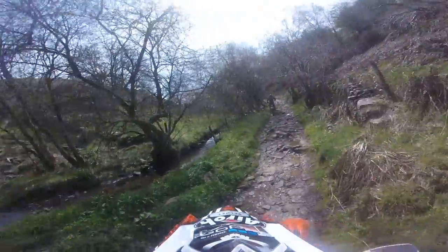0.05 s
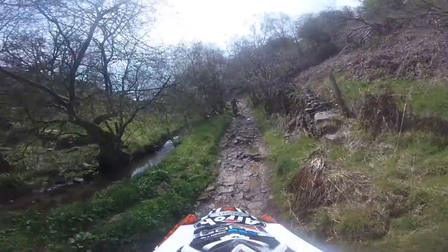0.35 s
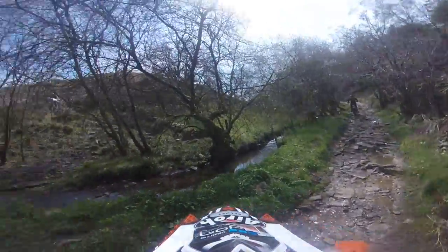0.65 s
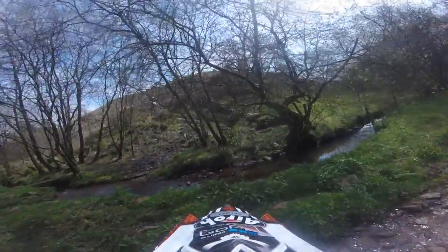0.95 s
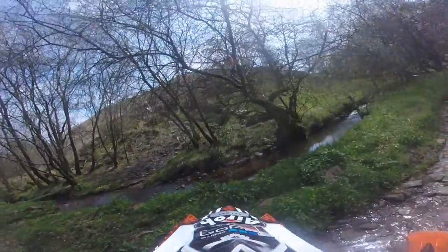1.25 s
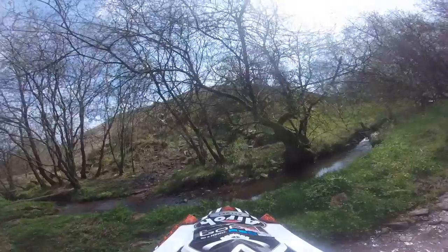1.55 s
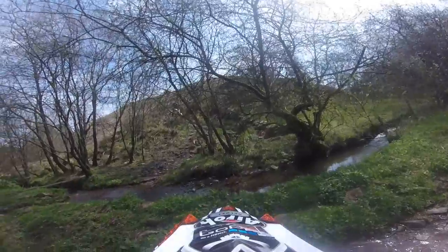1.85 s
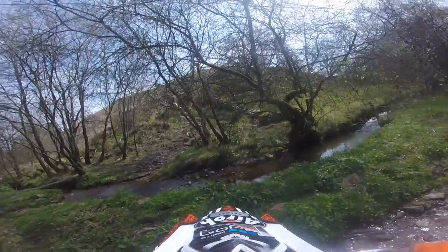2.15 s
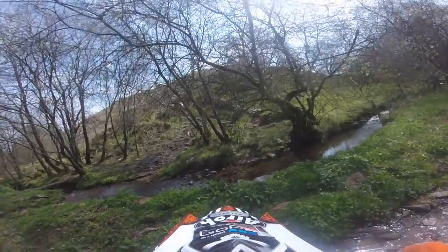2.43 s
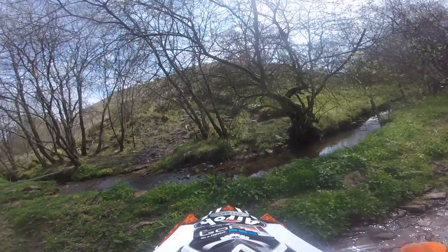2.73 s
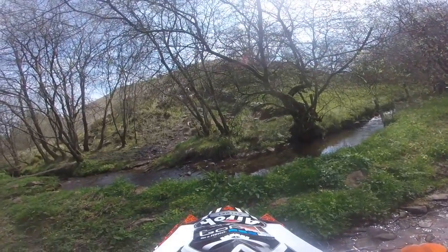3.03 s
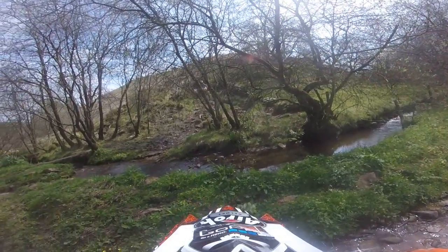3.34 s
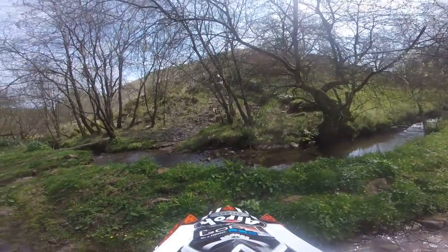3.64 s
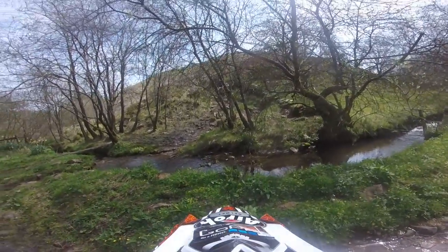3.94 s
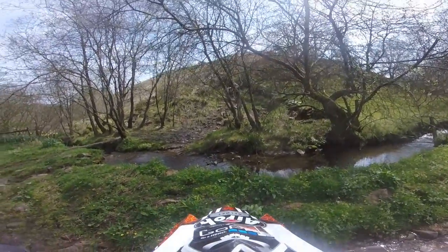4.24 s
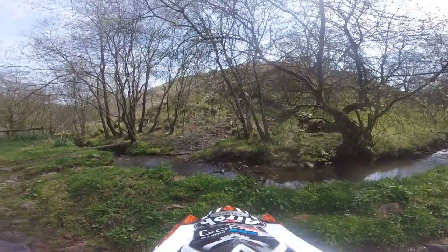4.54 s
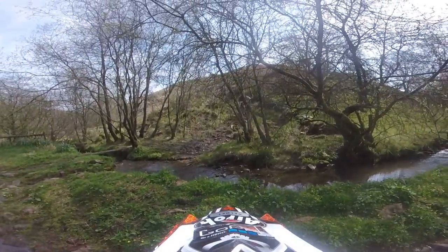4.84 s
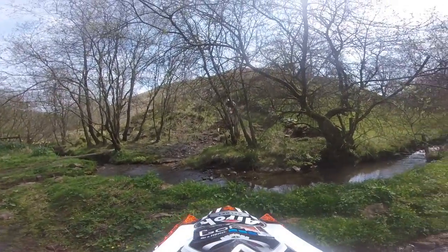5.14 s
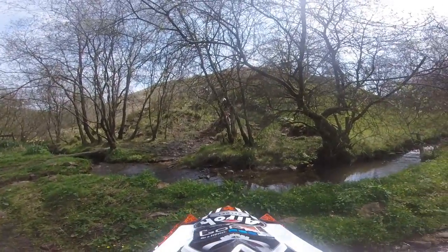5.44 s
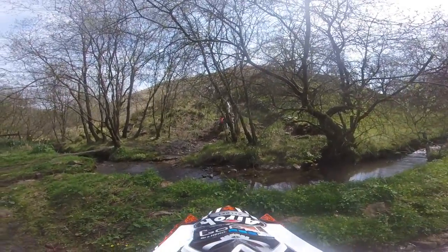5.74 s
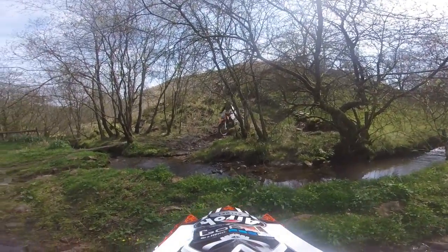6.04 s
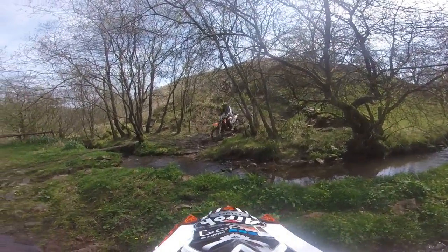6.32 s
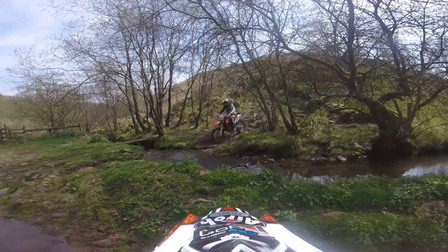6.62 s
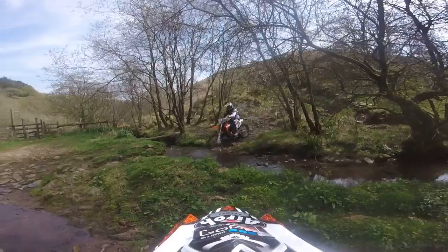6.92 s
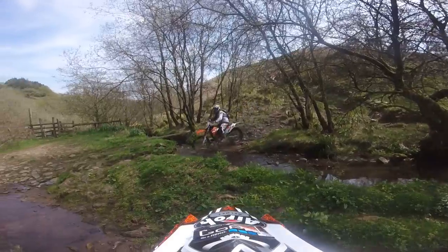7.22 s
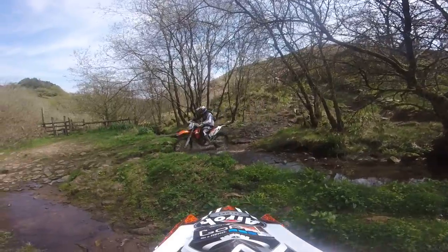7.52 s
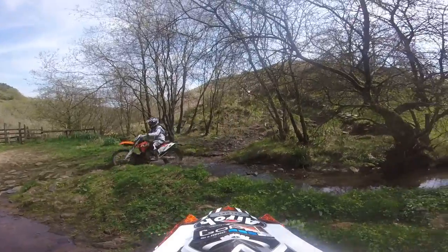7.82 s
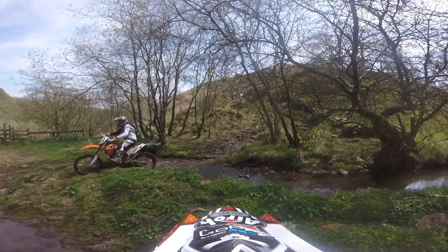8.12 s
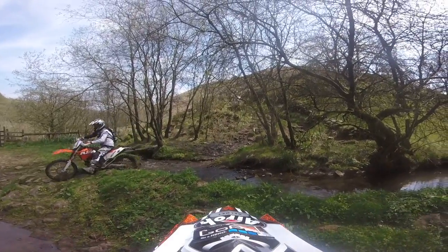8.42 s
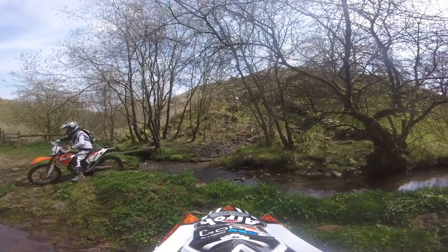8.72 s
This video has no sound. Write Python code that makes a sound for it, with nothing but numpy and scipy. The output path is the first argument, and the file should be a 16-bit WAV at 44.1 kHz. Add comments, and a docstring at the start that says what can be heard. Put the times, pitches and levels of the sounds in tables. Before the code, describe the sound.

A close dirt bike idles unevenly and shuts off, while a second one revs farther away, then splashes through a stream.

```python
"""Two dirt bikes at a stony ford

A two-stroke idles unevenly under a helmet microphone, popping and knocking, and is switched off at 3.4 s.
A second bike barks along the far bank, drops to tickover, fords the stream with spray and clacking
stones, and rolls past. Bubbles hiss throughout, wind rumbles on the microphone and a bird chips once."""
import sys
import numpy as np
from scipy import signal
from scipy.fft import rfft, irfft, next_fast_len
from scipy.io import wavfile
from scipy.ndimage import uniform_filter1d

SR = 44100
rng = np.random.default_rng(int(sys.argv[2]) if len(sys.argv) > 2 else 0)


def log_audio(samples):
    """Write samples as a 16-bit WAV file to the path given in sys.argv[1]."""
    # one column per channel
    frames = np.atleast_2d(samples).T
    # limit to full scale, then quantise
    limited = np.clip(frames, -1, 1)
    pcm = np.round(limited * 32767).astype(np.int16)
    wavfile.write(sys.argv[1], SR, pcm)


N = 391166
T = np.arange(N) / SR
IDLE_HZ = 18   # nominal firing rate of the near bike; engine speeds are all in firings per second


def from_db(db):
    """Decibels to gain."""
    return 10 ** (np.asarray(db) / 20)

def rms_one(x):
    """Scales to an rms of 1."""
    return x / np.sqrt(np.mean(x ** 2) + 1e-20)

def in_time(rows):
    """Straight lines through (t/s, value) points."""
    return np.interp(T, *np.transpose(rows))

def ramp(start_s, length_s):
    """Rises from 0 to 1 and stays there."""
    return np.clip((T - start_s) / length_s, 0, 1)

def swells(rows):
    """Bell-shaped gain swells (t/s, half length/s, level/dB), added in power."""
    return np.sqrt(sum((from_db(db) * np.exp(-((T - s) / half) ** 2)) ** 2 for s, half, db in rows))

def drift(per_s):
    """A random wander, rms 1."""
    knots = rng.standard_normal(int(N / SR * per_s) + 2)
    return rms_one(np.interp(T * per_s, np.arange(len(knots)), knots))

def evened(x):
    """Holds noise at a steady level of 1, so that gusts can shape it."""
    return x / np.sqrt(uniform_filter1d(x ** 2, size=12000))

def filtered(x, order, hz, kind):
    """Butterworth filter."""
    return signal.sosfilt(signal.butter(order, hz, kind, fs=SR, output="sos"), x)

def body(x, colour, modes=()):
    """Plays x through a broad colour with resonances on top; minimum phase, unit power gain."""
    size = next_fast_len(N + SR // 2, True) // 2 * 2
    hz = np.arange(size // 2 + 1) * SR / size + 1e-3
    at, level = np.transpose(colour)
    db = np.interp(np.log(hz), np.log(at), level) - 40 * np.log10(np.maximum(hz / at[-1], 1))
    for centre, width, lift in modes:
        db = db + lift / (1 + (2 * (hz - centre) / width) ** 2)
    cepstrum = irfft(np.log(rms_one(from_db(db))))
    response = np.exp(rfft(2 * cepstrum[:size // 2], size) - cepstrum[0])
    return irfft(rfft(x, size) * response)[:N]

def ring(x, hz, width_hz):
    """One damped mode, rms 1."""
    r = np.exp(-np.pi * width_hz / SR)
    return rms_one(signal.lfilter([1, 1], [1, -2 * r * np.cos(2 * np.pi * hz / SR), r * r], x + 1e-18))

def grains(per_s, spread_db):
    """Tiny impacts at random moments, their sizes scattered by spread_db."""
    sizes = from_db(spread_db * np.minimum(rng.exponential(1, N), 4)) * rng.choice([-1, 1], N)
    return rms_one(sizes * (rng.random(N) < per_s / SR))

def crank(speed, firing_s):
    """Crank turns counted from one firing; the others fall on the whole numbers."""
    turns = np.cumsum(speed) / SR
    return turns - np.interp(firing_s, T, turns)

def per_cycle(turns, spread_db):
    """A fresh strength for every turn."""
    cycle = np.floor(turns - np.floor(turns[0])).astype(int)
    return from_db(spread_db * rng.standard_normal(N // 1000))[cycle]

def stroke(turns, angle, width):
    """A smooth swell around one crank angle; angle and width in turns."""
    return np.exp(-(((turns - angle + .5) % 1 - .5) / width) ** 2)

def pops(turns, spread_db, rough, tail):
    """A pressure kick at each firing, trailed by a turbulent rush that decays over `tail` turns."""
    blows = rms_one(np.diff(np.floor(turns), prepend=np.floor(turns[0])))
    rush = rms_one(rng.standard_normal(N) * np.exp(-(turns % 1) / tail))
    return rms_one((blows + rough * rush) * per_cycle(turns, spread_db))

def slap(turns, tail, rise=.034):
    """A burst of metal chatter once a turn; tail and rise in turns."""
    share = turns % 1
    burst = np.minimum(share / rise, 1) * np.exp(-share / tail)
    return rms_one(burst * per_cycle(turns, spread_db=.8) * rng.standard_normal(N))


def stream():
    """Running water: a dense, steady fizz of bubbles."""
    # colour of the fizz: f/Hz, level/dB
    colour = [(100, 4), (190, 3), (300, 5), (500, -4), (900, -7), (1260, -3.5), (1450, -8), (2220, -11.5),
              (2800, -10.5), (3900, -16.5), (6000, -20), (9000, -26), (12000, -34.5), (14000, -38)]
    return from_db(-57.5) * body(grains(per_s=9000, spread_db=2), colour)

def wind():
    """An easing breeze and its gusts drive eddies on the microphone; buffets thud and leave a swing."""
    # gusts: t/s, half length/s, level/dB
    gusts = [(.05, 0.21, -34.5), (0.64, 0.4, -35), (1.29, 0.12, -29), (3.64, 0.25, -40),
             (0.936, 0.05, -28.5)]
    # colour of the eddies: f/Hz, level/dB
    rumble = [(8, -17), (16, -11), (24, 4), (34, 2), (48, -13), (80, -12.5), (150, -37.5), (400, -70)]
    # single buffets: t/s, peak/dB, half length/s, microphone swing/Hz
    buffets = [(0.031, -10.5, 0.017, 6.2), (0.769, -10.5, 0.025, 5.6), (1.231, -7.5, 0.0097, 15.5),
               (3.7, -17, 0.025, 16.6), (3.923, -21.5, 0.024, 12), (6.408, -38, .011, 27),
               (7.677, -29.5, 0.016, 13.5), (7.901, -43, .011, 31)]
    breeze_db, calm_db = -44, -53.5
    force = np.hypot(from_db(breeze_db + (calm_db - breeze_db) * ramp(4.35, .59)), swells(gusts))
    subsonic = filtered(rng.standard_normal(N + SR), 4, [4, 13], "band")[SR:]
    out = force * (evened(body(rng.standard_normal(N), rumble)) + from_db(6.5) * evened(subsonic))
    turbulence = evened(filtered(rng.standard_normal(N), 5, [45, 98], "band"))
    for s, db, half, hz in buffets:
        puff = -np.exp(-((T - s) / half) ** 2)
        swing = filtered(puff, 4, hz, "high")
        thud = swells([(s, .039, db - 26)]) * (.011 / half) ** 2 * turbulence   # slow puffs thud less
        out = out + from_db(db) * swing / np.abs(swing).max() + thud
    return out * ramp(0, .02)

def bird():
    """One thin rising note."""
    # the chip: t/s, length/s, start f/Hz, end f/Hz, level/dB
    chips = [(1.725, 0.05, 5840, 5970, -59.5)]
    s, length, start_hz, end_hz, db = chips[0]
    along = ramp(s, length)
    pitch = start_hz + (end_hz - start_hz) * along
    return from_db(db) * np.sin(np.pi * along) ** 2 * np.sin(2 * np.pi * np.cumsum(pitch) / SR)

def tyre_spray():
    """Front and rear wheel throw showers of droplets in the ford."""
    # wheel washes: t/s, half length/s, level/dB
    washes = [(7.24, 1, -62.5), (7.62, 0.089, -55), (7.62, .3, -60), (8.1, 0.061, -64)]
    # colour of the spray: f/Hz, level/dB
    splash = [(500, -8), (1600, 4), (2300, -7), (3000, 7.5), (3650, 5), (4500, -14), (5200, -7),
              (6500, -15), (7800, -13), (10000, -41), (13000, -41)]
    return body(swells(washes) * from_db(2 * drift(25)) * grains(per_s=4000, spread_db=1.5), splash)

def stones():
    """The wheels knock stones together: each gives a gritty clack and a short ring."""
    # stone hits: t/s, clack level/dB, decay/s, ring f/Hz, ring level/dB
    hits = [(3.85, -74, .025, 1800, -59), (6.125, -55, .015, 7400, -79), (6.575, -52, 0.009, 5360, -64),
            (6.829, -51.5, 0.014, 5270, -62), (6.995, -48, 0.014, 3060, -55),
            (7.012, -56, 0.013, 2920, -57), (7.071, -62, 0.01, 7900, -69)]
    # colour of stone on stone: f/Hz, level/dB
    clack = [(500, -4), (1500, 9), (2300, -1), (3200, 14.5), (4500, -2), (6000, -8.5), (7900, -2.5),
             (9500, -31), (13000, -22)]
    grit, knocks, rings = rng.standard_normal(N), 0, 0
    for s, db, decay, hz, ring_db in hits:
        dying = ramp(s, .001) * np.exp(-np.abs(T - s) / decay)
        knocks = knocks + from_db(db) * dying
        rings = rings + from_db(ring_db) * dying * ring(grit, hz, width_hz=280)
    return body(knocks * grit, clack) + rings


def through_trees(x):
    """Echoes off bank and trunks come and go as the bike moves, so overtones swell and fade singly."""
    echoes = sum(drift(7) * np.interp(T - delay_s, T, x) for delay_s in (.007, .019, .046, .083))
    return rms_one(x + from_db(-5) * echoes)

def rider_low_end(turns, speed, thump_db):
    """The second bike's firings thump in the exhaust, drone in the pipe and boom in the airbox."""
    # colour of the exhaust thump: f/Hz, level/dB
    thump_pipe = [(35, -12), (65, -5.5), (88, -5.5), (112, -3.5), (137, -2.5), (165, -19), (230, -22.5),
                  (400, -35)]
    # drone while the bike faces the listener: t/s, half length/s, level/dB
    drones = [(4.5, 0.11, -66.5), (5.7, 0.34, -62.5), (6.85, 0.67, -59)]
    # colour of the drone: f/Hz, level/dB
    drone_pipe = [(90, -32), (118, -8), (131, -0.5), (142, -6.5), (165, -36), (300, -56)]
    # short airbox booms: t/s, half length/s, level/dB
    booms = [(2.285, 0.051, -38.5), (4.09, 0.014, -45.5), (5.16, 0.095, -42), (5.38, 0.097, -49),
             (6.65, 0.043, -49.5), (6.9, 0.031, -50), (7.43, 0.056, -50.5), (7.9, 0.03, -58),
             (8.08, 0.076, -48)]
    # colour of the airbox: f/Hz, level/dB
    airbox = [(45, -35), (72, 1.5), (88, 12.5), (106, -6.5), (140, -10), (300, -51)]
    # faster firings are each weaker, so the thump keeps its power
    firings = rms_one(pops(turns, spread_db=1.1, rough=.44, tail=.9) / np.sqrt(speed))
    thump = from_db(thump_db) * body(firings, thump_pipe)
    return thump + swells(drones) * body(firings, drone_pipe) + swells(booms) * body(firings, airbox)

def rider_pipe(turns, throttle):
    """Firings ring the second bike's pipe: a clean bark on the throttle over a softer burble."""
    # colour of the pipe: f/Hz, level/dB
    pipe = [(120, -23), (220, -4), (290, 6.5), (330, 3), (395, -6.5), (460, -17), (535, -8), (620, -13.5),
            (1200, -33)]
    # bark at full throttle: t/s, level/dB
    bark_level = [(0, -58), (.45, -54), (.62, -49), (1.15, -51), (1.42, -56), (1.65, -52.5), (2.15, -51),
                  (2.7, -52), (3.25, -59), (3.62, -56.5), (4.3, -63.5)]
    # louder burble coasting down the bank: t/s, half length/s, level/dB
    burbles = [(5.25, .45, -68)]
    distant_pops = through_trees(pops(turns, spread_db=1.2, rough=.4, tail=.9))
    bark = from_db(in_time(bark_level)) * throttle * body(distant_pops, pipe)
    coasting = from_db(-68.5) + swells(burbles)
    passing = from_db(-61) * ramp(8.1, .15)   # the pipe swings towards the listener
    burble = body(pops(turns, spread_db=.7, rough=.55, tail=.9), pipe)
    return bark + np.hypot(coasting, passing) * burble

def rider_metal(turns, near_db):
    """The second bike's chain and valves clatter in time with the crank; taps ring its engine cover."""
    # colour of the engine case: f/Hz, level/dB
    case = [(200, 0.5), (500, 0.5), (700, 1), (930, 6), (1200, -2.5), (1400, -3.5), (1700, 4.5),
            (2300, -17.5), (2750, 5), (3350, 3), (4200, -19.5), (6300, -18), (9000, -38), (14000, -30)]
    # case resonances: f/Hz, width/Hz, lift/dB
    case_modes = [(1245, 130, 12.8), (2704, 140, 5)]
    # the cover rings out down the bank and in the ford: t/s, half length/s, level/dB
    flares = [(5.11, 0.13, -61.5), (5.46, 0.086, -65), (6.1, 0.17, -61), (7.1, 0.36, -62),
              (7.68, 0.05, -55)]
    # cover resonances: f/Hz, width/Hz, level/dB
    cover_modes = [(1270, 22, 0), (1655, 45, -9.5), (1780, 45, -19)]
    throb = 1 + .7 * np.exp(-(turns % 1) / .3) * per_cycle(turns, spread_db=1.8)
    impacts = rms_one(throb * from_db(1.3 * drift(20)) * grains(per_s=6000, spread_db=0))
    clatter = from_db(near_db + 7.5) * body(impacts, case, case_modes)
    taps = pops(turns - .2, spread_db=1.5, rough=.7, tail=.6)
    cover = sum(from_db(db) * ring(taps, hz, width) for hz, width, db in cover_modes)
    cover_gain = np.hypot(from_db(near_db - 3.5), swells(flares))
    chain = ring(throb * grains(per_s=1200, spread_db=4), hz=2820, width_hz=260)
    side_on = ramp(6.66, .84)   # the chain sings as the bike turns
    return clatter + cover_gain * cover + from_db(-65) * side_on * chain

def rider_rasp(turns):
    """Each firing trails a bright, gassy rasp as the second bike comes down to the water."""
    # rasping stretches: t/s, half length/s, level/dB
    rasps = [(6.0, 0.4, -69), (7.1, 0.82, -62.5)]
    # colour of the rasp: f/Hz, level/dB
    colour = [(1500, -16), (2300, -17), (2800, -0.5), (3600, 2), (4400, -18), (8000, -26)]
    return swells(rasps) * body(pops(turns, spread_db=2, rough=4, tail=1), colour)

def second_bike():
    """The rider's engine pulls along the far bank, falls to tickover and comes closer."""
    # speed with the throttle shut: t/s, firing rate/Hz
    tickover_speed = [(3.6, 16.01), (4.2, 15.64), (4.6, 15.28), (4.95, 13.22), (5.2, 15.59), (5.55, 14.75),
                      (5.9, 15.55), (6.4, 16.05), (6.8, 16.88), (7.3, 17.3), (7.9, 17.3), (8.3, 15.05),
                      (8.87, 14.11)]
    # revs on the throttle, wavering over rough ground: t/s, firing rate/Hz
    revs = [(0, 46), (.15, 47.5), (.27, 43), (.35, 46.4), (.51, 45), (.58, 49.9), (.7, 48.9), (.84, 45.7),
            (.91, 41.5), (.96, 44.3), (1.02, 40.4), (1.12, 40), (1.2, 41.5), (1.33, 39.3), (1.54, 55.3),
            (1.65, 53.2), (1.79, 47.5), (1.88, 50), (2.13, 42.3), (2.19, 46.6), (2.26, 45.4), (2.34, 47.8),
            (2.49, 47.4), (2.59, 44), (2.66, 49.2), (2.78, 47.6), (2.84, 50.4), (3, 49.3), (3.09, 53.3),
            (3.32, 49), (3.55, 53), (3.62, 50.8), (3.7, 53.6), (3.95, 46.4), (4.07, 44), (4.32, 42.4),
            (4.52, 13)]
    # base level of the metal as the bike comes into the open and turns away: t/s, level/dB
    approach = [(3.8, -69.5), (4.87, -74), (5.11, -72.5), (5.17, -73), (5.78, -72), (5.85, -67.5),
                (7.46, -64.5), (8.74, -68), (8.87, -63)]
    tickover, near_db = in_time(tickover_speed), in_time(approach)
    speed = np.maximum(tickover, in_time(revs))
    throttle = np.clip((speed - tickover) / 17, 0, 1)   # fully open 17 Hz above tickover
    turns = crank(speed, firing_s=4.611)
    load_db = .5 * throttle - .5 * (tickover - tickover.mean())   # a slower tickover thumps harder
    thump_db = -52.5 + load_db + .35 * (near_db - near_db.mean())
    return (rider_low_end(turns, speed, thump_db) + rider_pipe(turns, throttle)
            + rider_metal(turns, near_db) + rider_rasp(turns))


def idle_exhaust(turns):
    """Exhaust pops ring the near bike's silencer."""
    # colour of the silencer: f/Hz, level/dB
    silencer = [(40, -21), (80, 4.5), (135, -1), (190, -32), (240, -3.5), (330, -8.5), (450, -25),
                (900, -50)]
    # its resonance: f/Hz, width/Hz, lift/dB
    modes = [(72, 20, 9)]
    return from_db(-50) * body(pops(turns, spread_db=.8, rough=.22, tail=.3), silencer, modes)

def idle_intake(turns, speed, angle=.041):
    """The airbox hums with each gulp of air; its pitch loosely follows the speed, and it fades in a sag."""
    from_gulp_s = ((turns - angle + .5) % 1 - .5) / speed
    hz = 234 * (speed / IDLE_HZ) ** .45
    hum = rms_one(np.sin(2 * np.pi * hz * from_gulp_s) * stroke(turns, angle, width=.23))
    return from_db(-46.5 + .9 * np.minimum(speed - IDLE_HZ, 0)) * hum

def idle_gears(turns):
    """Meshing teeth whirr, loaded once a turn."""
    # gears: tooth passes per turn, load angle/turns, width/turns, level/dB
    gears = [(17, 0.18, 0.21, -59), (30, 0.44, 0.3, -64), (35, 0.4, 0.14, -68)]
    whirr = 0
    for teeth, angle, width, db in gears:
        mesh = np.sin(2 * np.pi * teeth * turns + .17 * drift(40))
        load = stroke(turns, angle, width) * from_db(.14 * drift(14))
        whirr = whirr + from_db(db) * rms_one(mesh * load)
    return whirr

def idle_clatter(turns):
    """The engine case rattles all the time; metal knocks and piston slaps land at set crank angles."""
    # metal knocks: angle after the pop/turns, f/Hz, width/Hz, level/dB
    knock_modes = [(.61, 1118, 69, -7), (.57, 830, 86, -21), (0.011, 1290, 25, -13), (0.85, 1100, 58, -26),
                   (.42, 504, 88, -17.5), (0.05, 555, 45, -18), (0.62, 1565, 51, -19),
                   (.91, 765, 87, -18.5), (0.86, 2720, 290, -14.5), (0.69, 3800, 170, -28)]
    # piston slaps: angle/turns, decay/turns, level/dB
    piston_slaps = [(0.59, 0.39, -50), (0.73, 0.17, -52.5), (0.142, 0.16, -57)]
    # colour of the case: f/Hz, level/dB
    case = [(150, 5.5), (330, -8), (420, -7), (650, -5), (880, -6.5), (1200, -10), (1850, -16.5),
            (2250, -16), (2800, -10), (3600, -20), (5100, -27), (5700, -37.5), (6400, -25.5), (7000, -31),
            (10000, -52.5), (14000, -67)]
    # case resonances under the rattle: f/Hz, width/Hz, lift/dB
    case_modes = [(521, 58, 8), (1090, 110, 5.1), (1262, 86, 9), (1550, 140, 9.5), (2630, 120, 1.5),
                  (4540, 180, -1), (5840, 270, -7), (6660, 260, -8)]
    # high resonances that only the slaps reach: f/Hz, width/Hz, lift/dB
    slap_modes = [(2630, 230, 4.6), (5180, 170, 11), (6000, 350, 5.2)]
    # stretches of harder knocks and slaps: t/s, half length/s, added share/dB
    hard_running = [(.08, 0.63, -8.5), (.85, .16, -14), (1.3, 0.18, -7.5)]
    knocks = sum(from_db(db) * ring(pops(turns - angle, spread_db=1.1, rough=.85, tail=.18), hz, width)
                 for angle, hz, width, db in knock_modes)
    rattle = body(grains(per_s=14000, spread_db=2), case, case_modes)
    slaps = sum(from_db(db) * slap(turns - angle, tail) for angle, tail, db in piston_slaps)
    bright = filtered(body(slaps, case, slap_modes), 2, [2000, 6500], "band")
    return from_db(-45.5) * rattle + (1 + swells(hard_running)) * (from_db(-49) * knocks + bright)

def idle_tick(turns):
    """A crisp metal tick once a turn, as hard at any speed."""
    # ring of the tick: f/Hz, width/Hz, level/dB
    modes = [(3760, 600, -78), (4960, 120, -76.5), (6090, 190, -85)]
    tap = slap(turns - .7, tail=.09)
    return filtered(sum(from_db(db) * ring(tap, hz, width) for hz, width, db in modes), 2, 3000, "high")

def near_bike(off_s=3.406):
    """The idling two-stroke swells and sags with its speed; switched off, the clatter dies last."""
    # hunting idle that almost stalls once: t/s, firing rate/Hz
    idle_speed = [(0, 19.69), (.2, 19.39), (.5, 16.72), (.65, 17.62), (.8, 17.16), (.95, 17.31),
                  (1.15, 17.79), (1.35, 19.1), (1.55, 17.56), (1.75, 11.3), (1.95, 16.01), (2.15, 18.17),
                  (2.4, 18.08), (2.6, 19.16), (2.9, 18.41), (3.1, 18.51), (3.25, 18.77), (3.5, 15.5)]
    speed, since_off = in_time(idle_speed), np.maximum(T - off_s, 0)
    turns = crank(speed, firing_s=.0127)
    drive = from_db(.97 * (speed - IDLE_HZ) - 88 * since_off)
    shake, metal_fade = from_db(.83 * (speed - IDLE_HZ)), from_db(-39 * since_off)
    running = idle_exhaust(turns) + idle_intake(turns, speed) + idle_gears(turns)
    return drive * running + metal_fade * (shake * idle_clatter(turns) + idle_tick(turns))


def scene():
    """Everything meets at one microphone."""
    return (near_bike() + second_bike() + stream() + tyre_spray() + stones() + wind() + bird())[None]

def record(dry):
    """A steep low-pass cuts the top at 14.2 kHz."""
    return signal.sosfilt(signal.ellip(10, .1, 90, 14200, fs=SR, output="sos"), dry)


dry = scene()
out = record(dry)
log_audio(out)
```